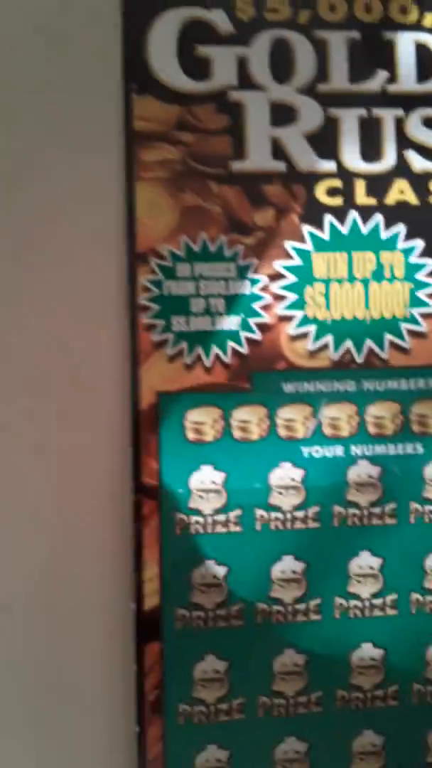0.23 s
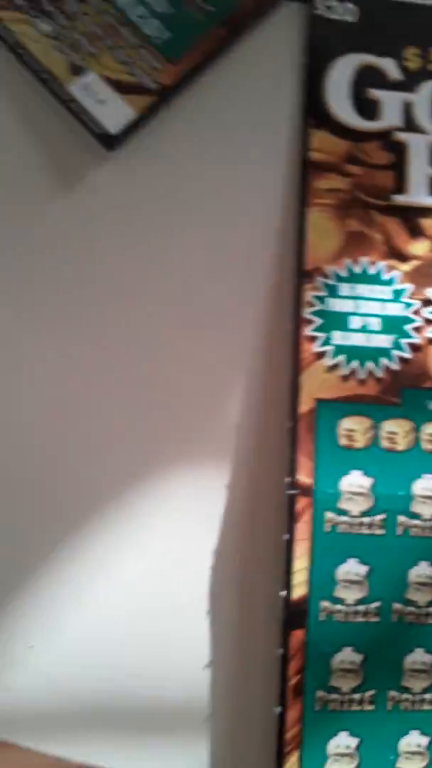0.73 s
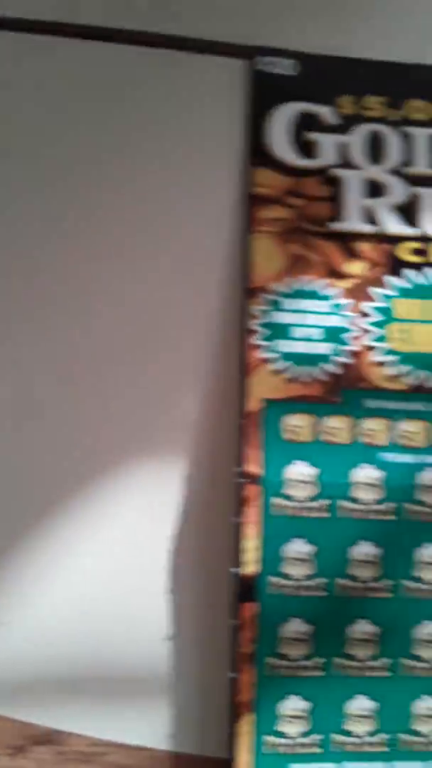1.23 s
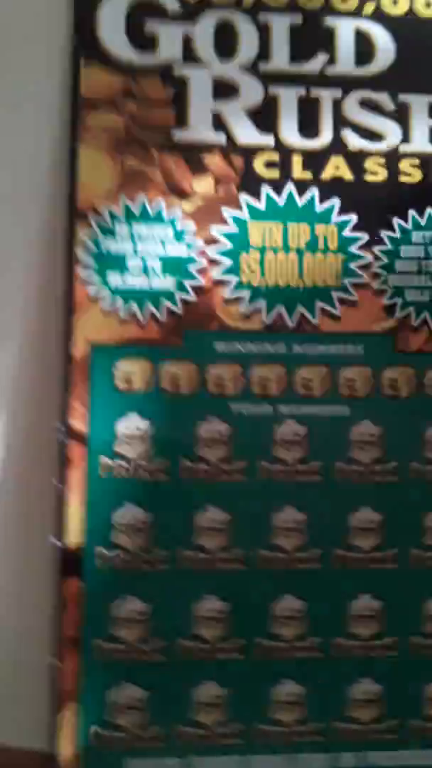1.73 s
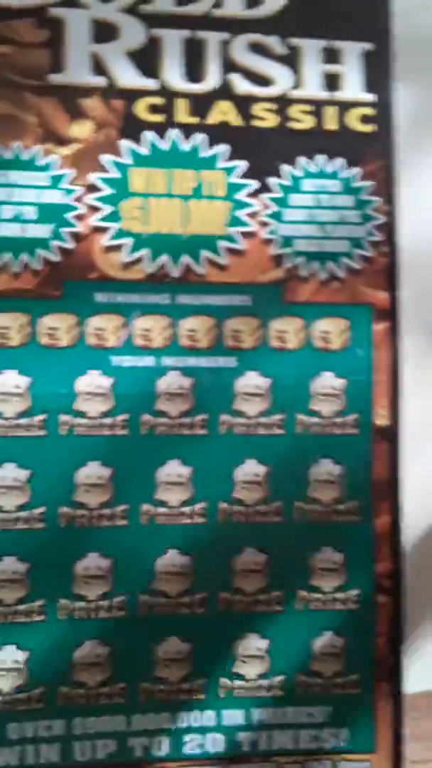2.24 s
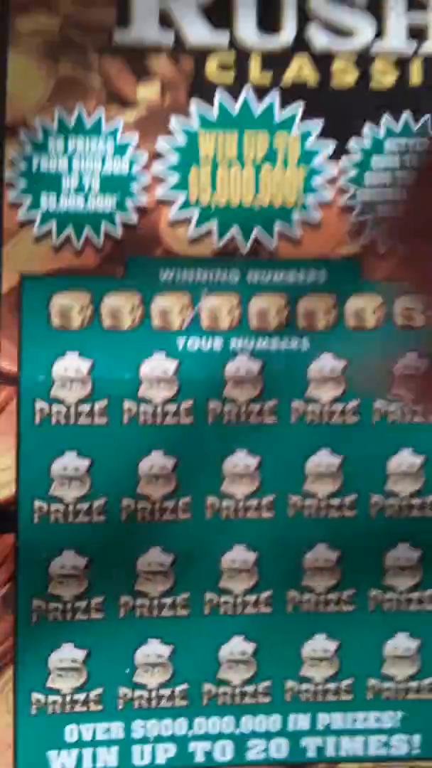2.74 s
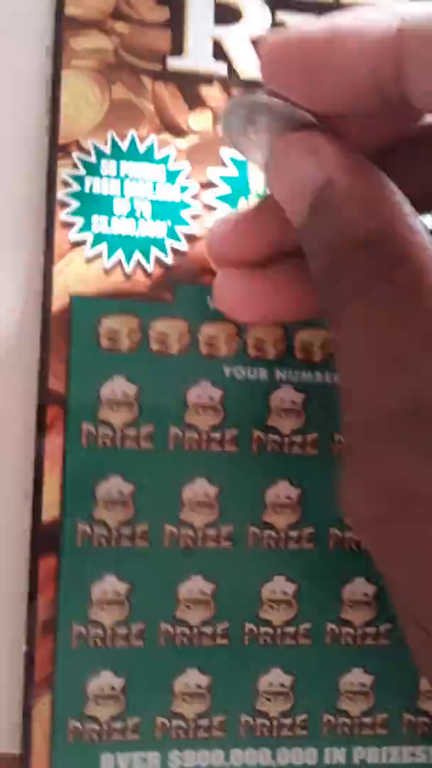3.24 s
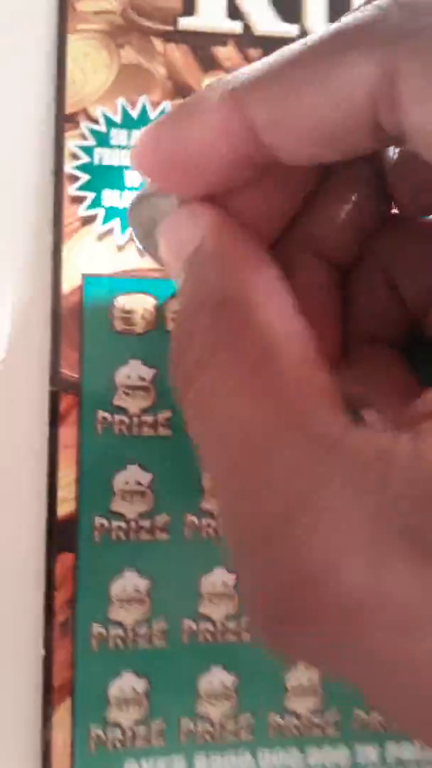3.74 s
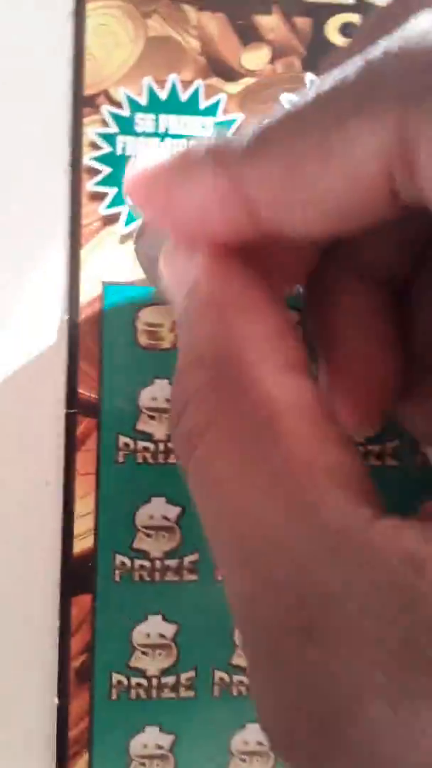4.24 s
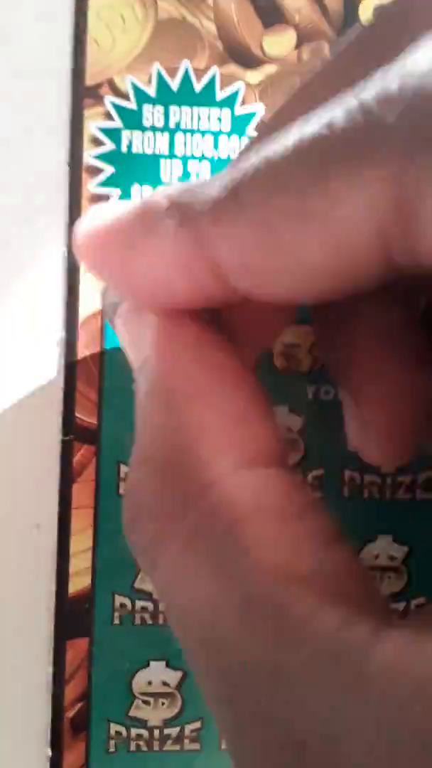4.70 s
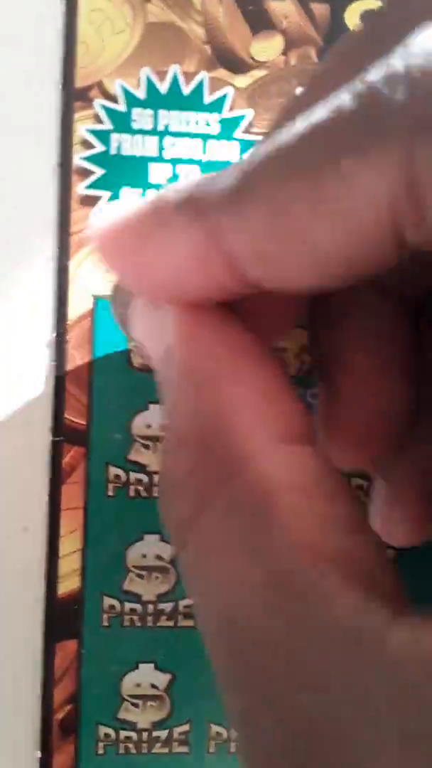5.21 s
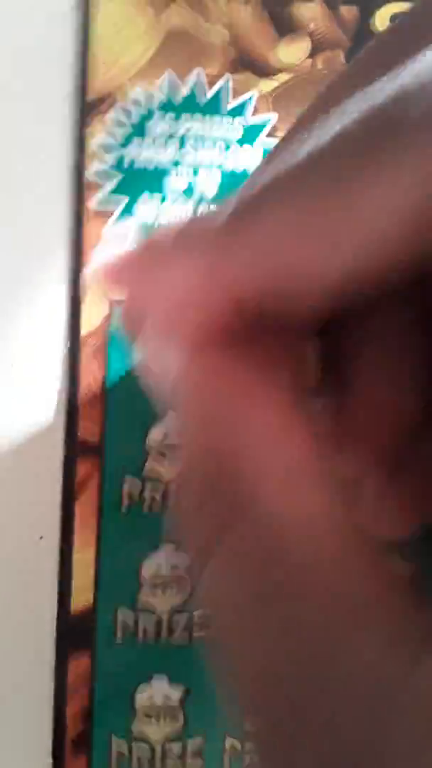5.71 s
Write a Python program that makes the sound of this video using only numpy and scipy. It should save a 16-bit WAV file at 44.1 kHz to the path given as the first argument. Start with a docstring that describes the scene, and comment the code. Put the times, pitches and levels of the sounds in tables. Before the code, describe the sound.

Close, mostly dry stereo sound at a table in a small live room, with a faint wavering low hum and soft hiss beneath. From 0 to 0.35 s a stiff card rustles in short slides, with light bumps and a crisp tick near 0.3 s; a fainter tick comes at 0.6. Around 0.72 s it snaps, and from 0.9 to 1.15 s it drags loudly, bright and papery, with several sharp cracks, the loudest event. Dull small wooden knocks follow at 1.4-1.55 s, then faint ticks and brushes near 1.8-2.2 s, and a firmer double knock at 2.5 s. Soft slides recur up to 3.5 s. A clear tick at 3.8 s leads to coin scraping from 4.0 s: weak first strokes, stronger after 4.4 s, short, irregular, about ten to twelve a second, gritty and hissing, with a woody midrange ring, continuing to the end with a sharp tick near 5.87 s.

```python
"""Card and coin on a table top

A card slides, cracks, ticks and knocks on a table top close to a pair of microphones: shaped noise and puffs.
Then a coin scrapes its coating in short quick strokes: random grit that hisses and makes the table ring.
Narrow bands of noise hum underneath, with soft random-spectrum room noise and a tail of sparse echoes."""
import sys
import numpy as np
from scipy import signal
from scipy.io import wavfile
from scipy.ndimage import uniform_filter1d

SR = 44100
rng = np.random.default_rng(int(sys.argv[2]) if len(sys.argv) > 2 else 0)


def amplitude_ratio(level_db):
    """Convert a level in decibels to the matching linear amplitude (field) ratio."""
    exponent = np.asarray(level_db, float) / 20
    return 10 ** exponent


def log_audio(samples):
    """Write samples as a 16-bit WAV file to the path given in sys.argv[1]."""
    # one column per channel
    frames = np.atleast_2d(samples).T
    # limit to full scale, then quantise
    limited = np.clip(frames, -1, 1)
    pcm = np.round(limited * 32767).astype(np.int16)
    wavfile.write(sys.argv[1], SR, pcm)


N = 262880


def evened(x):
    """Scales to rms 1."""
    return x / np.sqrt(np.mean(x ** 2) + 1e-20)


def read(points, hz):
    """Reads a table on a log-frequency axis."""
    f, value = np.transpose(points)
    return np.interp(np.log(hz + 1), np.log(f + 1), value)


def coloured(x, points):
    """Causal minimum-phase filter with the given spectrum; white rms 1 stays rms 1."""
    hz = abs(np.fft.fftfreq(4096, 1 / SR))
    log_gain = np.log(amplitude_ratio(np.maximum(read(points, hz), -100)))
    taps = np.fft.ifft(np.exp(signal.hilbert(log_gain).conj())).real[:2048]
    taps = (taps / np.linalg.norm(taps)).reshape((1,) * (x.ndim - 1) + (-1,))
    return signal.oaconvolve(x, taps, axes=-1)[..., :x.shape[-1]]


def tinted(puff, points):
    """Colours a puff and keeps its energy."""
    out = coloured(puff, points)
    return out * np.linalg.norm(puff) / np.linalg.norm(out)


def wander(steps):
    """Slow chance, about rms 1, changing over about the given number of samples."""
    slow = uniform_filter1d(rng.standard_normal(N // 64 + 2), max(round(steps / 64), 1))
    return np.interp(np.arange(N) / 64, np.arange(len(slow)), evened(slow))


def resonate(x, hz, width):
    """A resonance that follows the curve hz; white rms 1 stays rms 1."""
    turn = np.exp(2j * np.pi * np.cumsum(hz) / SR)
    r = np.exp(-np.pi * width / SR)
    return np.sqrt(2 * (1 - r * r)) * (turn * signal.lfilter([1], [1, -r], x / turn)).real


def ringing(x, modes, moving_db, steady):
    """Damped modes, excited unevenly as the contact moves; slipping locks to the ring and steadies it."""
    t = np.arange(4096) / SR
    out = 0
    for hz, width, db in modes:
        decay = t * np.exp(-1.5 * np.pi * width * t)
        tap = amplitude_ratio(db) * (1.5 * width) ** 2 * decay * np.sin(2 * np.pi * hz * t)
        drive = x * amplitude_ratio(moving_db * wander(3000))
        out = out + signal.oaconvolve(drive, tap[None], axes=1)[:, :N]
    power = abs(uniform_filter1d((out ** 2).mean(0), 220)) + 1e-12
    return evened(out / power ** (np.clip(steady, 0, 1) / 2))


def envelopes(start, length, db, shape):
    """Gain of a run of gestures: each rises, sags while held, and falls away."""
    rise, sag_db, fall, end_db = shape
    corners = [0, np.clip(rise, .02, .5), 1 - np.clip(fall, .02, .48), 1]
    out, t = np.zeros(N), np.arange(N) / SR
    for s, span, peak_db in zip(start, np.maximum(length, .005), db):
        at = slice(*np.searchsorted(t, [s, s + span]))
        progress = (t[at] - s) / span
        out[at] += amplitude_ratio(peak_db + np.interp(progress, corners, [end_db, 0, sag_db, end_db]))
    return out


def grit(per_s, spread_db, clump_db):
    """Tiny catches of an edge on a rough face: random clicks of uneven size that come in clumps."""
    size = amplitude_ratio(spread_db * np.minimum(rng.exponential(1, N), 4)) * rng.standard_normal(N)
    clumps = evened(uniform_filter1d(uniform_filter1d(rng.standard_normal(N), 120), 120))
    return evened(size * (rng.random(N) < per_s / SR) * amplitude_ratio(clump_db * clumps))


def spread(per_s, spread_db, clump_db, same, lag):
    """Grit at two ports: a shared part, lag samples later on the left (earlier if negative), plus their own."""
    shared, same = grit(per_s, spread_db, clump_db), np.clip(same, 0, 1)
    own = np.array([grit(per_s, spread_db, clump_db) for port in "lr"])
    return np.sqrt(same) * np.array([np.roll(shared, round(lag)), shared]) + np.sqrt(1 - same) * own


def burst(t60, same, lag):
    """A dying puff of noise at both ports; the left hears its shared part lag samples later."""
    t, same = np.arange(8000) / SR, np.clip(same, 0, 1)
    onset = np.minimum(t / 0.0005, 1)
    shape = 0.33 * amplitude_ratio(-60 * t / np.clip(t60, .002, .25)) * onset
    shared, left, right = shape * rng.standard_normal((3, 8000))
    common = np.array([np.roll(shared, round(lag)), shared])
    puff = np.sqrt(same) * common + np.sqrt(1 - same) * np.array([left, right])
    return puff * np.linalg.norm(shape) / np.linalg.norm(puff, axis=1, keepdims=True)


def panned(pan_db):
    """Gains of the two ports, pan_db being left over right."""
    return amplitude_ratio([pan_db / 2, -pan_db / 2]).reshape(2, -1)


def add(mix, s, sound, pan_db):
    """Mixes a short two-port sound in at s seconds."""
    part = mix[:, round(s * SR):][:, :sound.shape[1]]
    part += (sound * panned(pan_db))[:, :part.shape[1]]


# Spectrum of the room noise: (frequency [Hz], relative density [dB/Hz])
AIR_SPECTRUM = [(12, -65), (20, -35), (37, -12), (60, -12), (75, -22), (143, 8.5), (195, -22.5),
                (297, -28.5), (440, -28), (616, -31), (1210, -37), (3230, -39.5), (8650, -50),
                (15200, -40.5), (16500, -61)]
# How alike the two ports are, in the noise and in the room tail: (frequency [Hz], likeness [-1 to 1])
PORT_LIKENESS = [(60, 0.1), (180, 0.76), (550, 0.41), (1650, -0.00019), (4970, -0.027), (15000, -0.086)]


def air():
    """Room noise and microphone hiss: random spectra above 180 Hz with faint drifting patches."""
    frames, hz = N // 512 + 5, np.fft.rfftfreq(2048, 1 / SR)
    a, b, c, d, patches = rng.standard_normal((frames, 1025, 5)).T
    patches = evened(uniform_filter1d(uniform_filter1d(patches, 20, 0), 8, 1))
    same = np.clip(read(PORT_LIKENESS, hz), -1, 1)[:, None]
    left, own = a + 1j * b, c + 1j * d
    z = np.array([left, same * left + np.sqrt(1 - same ** 2) * own])
    z *= amplitude_ratio(read(AIR_SPECTRUM, hz)[:, None] + 1.93 * patches) * (hz > 180)[:, None]
    noise = signal.istft(z, nperseg=2048, noverlap=1536)[1][:, :N]
    return amplitude_ratio(-63.5) * evened(noise)


# Fuzzy low tones: (frequency [Hz], width [Hz], level [dB], steadiness [0 to 1])
HUM_TONES = [(56.5, 13.07, -70, 0.1), (75.5, 15, -74.5, 0.2), (107, 23, -66, 0), (144.2, 14.9, -59, 0.38)]
# Wavering of the highest tone, heard as its swing about the mean: (time [s], level [dB])
HUM_SWELL = [(0.0, -54), (0.2, -51.5), (0.28, -63.5), (0.8, -56.5), (1.31, -64.5), (2.39, -56), (2.61, -69),
             (2.72, -53), (2.82, -68.5), (3.88, -57.5), (3.97, -64.5), (5.0, -58.5), (5.26, -68.5),
             (5.28, -58), (5.5, -54), (5.71, -63), (5.93, -56), (5.96, -52)]


def hum():
    """Distant machinery in room resonances: narrow bands of noise, the highest one swelling."""
    t, tones = np.arange(N) / SR, []
    for hz, width, db, steady in HUM_TONES:
        r = np.exp(-np.pi * width / SR)
        slow = rng.standard_normal((2, N)) + 1j * rng.standard_normal((2, N))
        ports = [slow[0], slow[0] + 0.225 * slow[1]]
        slow = signal.lfilter([1], [1, -2 * r, r * r], ports, axis=1)
        slow /= abs(slow[0]) ** steady  # a steady tone wavers less than plain noise
        tones.append(amplitude_ratio(db) * evened((slow * np.exp(2j * np.pi * hz * t)).real))
    swell_db = np.interp(t, *np.transpose(HUM_SWELL))
    tones[-1] *= amplitude_ratio(swell_db - swell_db.mean())
    return sum(tones) * amplitude_ratio([[.8], [-.8]])


# Short slides of card or fingers, levels before the layer trims:
# (start [s], length [s], rustle [dB], top over rustle [dB], body over rustle [dB], focus [Hz])
SLIDES = [(-.01, 0.071, -46, -0.5, -3.5, 4200), (0.057, 0.088, -55, 0, -8, 4000),
          (0.146, 0.12, -58.5, 4, -15, 3680), (0.235, 0.12, -59, -4, -9, 3540),
          (0.719, 0.046, -49, -1, -21, 3500), (0.756, 0.045, -58, -9.5, -10, 3700),
          (1.812, 0.049, -61.5, -2, 5.5, 3600), (1.885, 0.1, -63, -15, -0.5, 3820),
          (2.077, 0.088, -60, -5, -5, 4620), (2.203, 0.3, -70, -10, 0, 2100),
          (2.69, 0.2, -67.5, -8, -0.5, 2120), (2.888, 0.11, -76, 7.5, 3, 3840),
          (3.075, 0.065, -65.5, -3.5, -2, 2960), (3.227, 0.051, -66.5, -10, -2.5, 3950),
          (3.262, 0.054, -60.5, -8, -6, 3940), (3.294, 0.14, -61.5, -1.5, -6.5, 4100),
          (3.512, 0.028, -64, -6, -7, 4170)]
# Contour of a slide: (share of the length rising, sag while held [dB], share falling, level at the ends [dB])
SLIDE_SHAPE = (0.28, -3.5, 0.4, -15)
# One long loud drag of the card, levels before the layer trims:
# (time [s], rustle [dB], top over rustle [dB], body over rustle [dB], focus [Hz])
DRAG = [(0.815, -61, -0.5, -15, 3800), (0.867, -46.5, -10, -14.5, 4240), (0.904, -53, -11.5, -10, 3070),
        (0.943, -39, -2.5, -17, 2940), (0.964, -41.5, -11, -15.5, 4320), (1.028, -30.5, -2.5, -13, 5370),
        (1.065, -32, 1, -21.5, 5900), (1.139, -36.5, -7, -12, 3880), (1.225, -69, -11, 4, 4540),
        (1.3, -83.5, -23, 6, 4600)]
# Spectra of the card's rustle, top and body: (frequency [Hz], relative density [dB/Hz])
RUSTLE = [(880, -34.5), (1500, -21.5), (1670, -34), (1990, -3.5), (2190, -5), (2390, -7.5), (3410, -8),
          (6890, -8), (8500, -40.5), (11000, -36), (18700, -120)]
RUSTLE_TOP = [(4410, -27.5), (7500, 3.5), (8310, -3.5), (11600, 2.5), (15400, -2.5), (16200, -31),
              (16500, -53.5)]
RUSTLE_BODY = [(120, -24), (300, -4.5), (520, -3), (1000, -1), (1900, -0.5), (2800, -27)]
# Where the card is handled: (time [s], left over right [dB])
CARD_SIDE = [(0, 4), (.7, 4), (1.1, 0.5), (1.9, 3), (2.3, -1), (3.5, 2)]


def slides():
    """Paper dragged over paper and wood: dense grit through the rustle of the card, with a moving focus."""
    t = np.arange(N) / SR
    start, length, db, top_db, body_db, hz = np.transpose(SLIDES)
    s, drag_db, drag_top_db, drag_body_db, drag_hz = np.transpose(DRAG)
    dragging = (t > s[0]) & (t < s[-1])

    def layer(rel_db, drag_rel_db):
        """Gain of one band through the short slides and the long drag."""
        drag = dragging * amplitude_ratio(np.interp(t, s, drag_db + drag_rel_db))
        return envelopes(start, length, db + rel_db, SLIDE_SHAPE) + drag

    mid, top, body = layer(0, 0), layer(top_db, drag_top_db), layer(body_db, drag_body_db)
    latest = np.maximum(np.searchsorted(start, t) - 1, 0)
    focus_hz = np.where(dragging, np.interp(t, s, drag_hz), hz[latest])
    focus_db = np.where(dragging, -11.5, -6.5)  # how strongly the card sings at its focus
    catches = spread(14000, 2.9, 2.7, 0.34, -14)
    rustle = coloured(mid * catches, RUSTLE)
    sound = amplitude_ratio(1) * rustle + amplitude_ratio(focus_db) * resonate(rustle, focus_hz, 520)
    sound += amplitude_ratio(3.0) * coloured(top * catches, RUSTLE_TOP)
    sound += amplitude_ratio(3.5) * coloured(body * catches, RUSTLE_BODY)
    return sound * panned(np.interp(t, *np.transpose(CARD_SIDE)))


# The hand leans on the table top: (start [s], length [s], level [dB])
BUMPS = [(-.01, 0.04, -46), (0.021, 0.05, -40.5), (0.105, 0.058, -49), (0.292, .05, -59),
         (0.753, 0.04, -53.5), (0.838, 0.08, -51), (1.008, 0.034, -55), (1.1, 0.055, -56),
         (1.813, 0.034, -59)]
# Coin strokes, to and fro: (start [s], length [s], ring of the table [dB], dull rub [dB],
# low thud [dB], hiss of the coating [dB])
STROKES = [(4.008, 0.022, -62, -59.5, -64, -74.5), (4.124, 0.053, -59.5, -51, -57.5, -61),
           (4.247, 0.042, -58, -59, -66, -63), (4.334, .06, -54, -56, -56, -62.5),
           (4.428, 0.051, -44.5, -52, -69, -56.5), (4.509, 0.049, -50.5, -48.5, -53, -51.5),
           (4.595, .03, -40.5, -51, -66, -56), (4.617, 0.038, -54, -52.5, -65, -58),
           (4.676, 0.02, -50, -55, -52, -53.5), (4.686, 0.059, -54.5, -52, -54, -58.5),
           (4.762, 0.02, -50, -54, -58, -58), (4.789, 0.023, -43.5, -47.5, -59, -62),
           (4.838, 0.051, -48.5, -51, -53.5, -58.5), (4.922, 0.026, -46.5, -56.5, -63, -63),
           (4.945, 0.031, -66, -57.5, -65, -64), (5.013, 0.054, -45.5, -52.5, -52.5, -58.5),
           (5.086, 0.065, -39.5, -53, -62, -54.5), (5.181, 0.059, -43.5, -52.5, -56, -55.5),
           (5.268, 0.054, -40.5, -52.5, -58, -56.5), (5.35, 0.056, -45, -51, -59, -59),
           (5.407, 0.075, -63, -62, -59, -62.5), (5.468, 0.022, -45, -61, -63, -66),
           (5.506, 0.052, -61, -61, -56.5, -65), (5.544, .022, -38.5, -58, -55, -50.5),
           (5.564, 0.016, -40, -49.5, -48, -61), (5.624, 0.038, -50, -59, -60, -65),
           (5.702, .08, -43.5, -51.5, -51, -55), (5.798, 0.039, -46, -66, -67, -55.5),
           (5.88, .026, -48.5, -51.5, -52.5, -57), (5.897, 0.047, -42.5, -53.5, -51, -54.5)]
# Contour of a stroke: (share of the length rising, sag while held [dB], share falling, level at the ends [dB])
STROKE_SHAPE = (0.34, -3.5, 0.23, -15.5)
# Lowest modes of the table top: (frequency [Hz], width [Hz], relative level [dB])
LOW_MODES = [(219, 253, -8.5), (262.7, 33, 0.5), (328, 31, 2), (426, 107, -10)]


def thuds():
    """The weight of coin and hand drives the lowest modes of the table top."""
    start, length, _, _, thud_db, _ = np.transpose(STROKES)
    coin_weight = envelopes(start + .006, length, thud_db, STROKE_SHAPE)  # the table answers 6 ms late
    hand_weight = envelopes(*np.transpose(BUMPS), SLIDE_SHAPE)
    modes = ringing(spread(8200, 1.5, 1.2, 0.92, -3.7), LOW_MODES, 2.4, 0.97)
    return (coin_weight + hand_weight) * modes * panned(1.5)


# Dry ticks of an edge or nail:
# (time [s], level [dB], low relative level [dB], top relative level [dB], left over right [dB])
TICKS = [(0.0313, -35, -13, -5, 9), (0.2967, -22.5, 0.5, -25, 5), (0.6209, -35, -5, 0.5, 5.5),
         (1.2354, -42, 11, -15, 11), (1.8263, -45, 9, -13, 5), (1.9066, -36, 8.5, -13, 7.5),
         (3.8088, -20.5, -6.5, -12, 3.5), (5.487, -43, -11, -8, 2.5), (5.66, -38.5, -17, 7, 5),
         (5.7249, -37.5, 5, 3, 14), (5.8106, -46, 11, 3, 6), (5.8724, -23, -36, -5, -5.5)]


def ticks():
    """An edge taps briefly: a very short noise puff split into low, middle and top bands."""
    out = np.zeros((2, N))
    for s, db, low_db, top_db, pan_db in TICKS:
        puff = burst(0.0089, 0.43, 12)
        low = tinted(puff, [(300, 0.0), (700, -14), (3200, -4.0), (5000, -21), (9000, -46)])
        mid = tinted(puff, [(1000, -55), (2400, -29), (3800, -6.5), (6500, 7), (8200, -5), (11000, -20)])
        top = tinted(puff, RUSTLE_TOP)
        add(out, s, amplitude_ratio(db) * (mid + amplitude_ratio(low_db) * low + amplitude_ratio(top_db) * top), pan_db)
    return out


# Paper cracks as the card bends:
# (time [s], level [dB], centre [Hz], top relative level [dB], left over right [dB])
SNAPS = [(0.159, -38.5, 7300, -23, 21.5), (0.1996, -37.5, 3720, -0.5, 4), (0.7228, -24, 3640, -46, 7),
         (0.7494, -28, 3680, -25, 1.5), (0.9185, -21.5, 2680, -25, 11.5), (0.9426, -16, 2670, -26, 4.5),
         (0.988, -13, 6100, -16, 6), (1.0584, -10.5, 6730, -8, 4), (1.117, -11.5, 2400, -18, 1),
         (1.9325, -43, 3600, -13, 2)]


def snaps():
    """Bending paper cracks: a brief noise puff round its own centre, with a bright top."""
    out = np.zeros((2, N))
    for s, db, hz, top_db, pan_db in SNAPS:
        puff = burst(0.039, 0.6, 12)
        centre = [(hz / 4, -35), (hz / 1.84, -11), (hz, 0), (hz * 1.35, -9), (hz * 5.1, -18), (hz * 5, -40)]
        crack = tinted(puff, centre) + amplitude_ratio(top_db) * tinted(puff, RUSTLE_TOP)
        add(out, s, amplitude_ratio(db) * crack, pan_db)
    return out


# Dull knocks on the table:
# (time [s], level [dB], centre [Hz], middle relative level [dB], top relative level [dB])
KNOCKS = [(1.385, -35.5, 770, -8, -45), (1.443, -40.5, 736, -18, -31), (1.508, -27.5, 730, -12, -33),
          (1.549, -43.5, 785, -7, -38), (1.822, -47, 404, 4.5, -14), (2.478, -26.5, 600, 3.5, -9),
          (2.504, -34, 610, 5.5, -1)]
# What lingers after a knock: (frequency [Hz], relative level [dB], t60 [s])
LINGERING_MODES = [(494, 6.5, .2), (1514, 9, 0.15), (2010, 1, 0.4), (2190, 0, 0.36), (3020, 7, 0.2)]
# Middle modes of card and table, also rubbed by the coin: (frequency [Hz], width [Hz], relative level [dB])
MIDDLE_MODES = [(646, 19.4, -5.5), (809, 136, 4.5), (844, 17, -31), (1059.4, 29, 2.5), (1094, 240, -2)]


def knocks():
    """A blow on the table top: wooden body and modes, sharper middle, thin top and modes that linger."""
    out, t = np.zeros((2, N)), np.arange(SR // 3) / SR
    linger = sum(amplitude_ratio(db - 60 * t / t60) * np.sin(2 * np.pi * f * t) for f, db, t60 in LINGERING_MODES)
    linger = linger[None] / np.linalg.norm(linger)
    wood = sum(amplitude_ratio(db) * np.sqrt(w) * np.exp(-np.pi * w * t) * np.sin(2 * np.pi * f * t)
               for f, w, db in MIDDLE_MODES)
    wood = wood[None] / np.linalg.norm(wood)
    side_db = 0.5
    for s, db, hz, mid_db, top_db in KNOCKS:
        puff = burst(.13, 0.38, 10.3)
        body = tinted(puff, [(hz / 3.3, -32), (hz / 1.76, -9), (hz, 0), (hz * 1.4, -6),
                             (hz * 5, -22), (hz * 12, -60)])
        middle = tinted(puff, [(300, -35.5), (900, -5), (1600, -1.0), (3000, -6.5),
                               (5000, -16.5), (8000, -22.5), (12000, -80)])
        top = tinted(puff, [(1500, -79.0), (3500, -13), (5500, -9.0), (8500, -15.5),
                            (12500, -7.5), (16500, -26.5)])
        add(out, s, amplitude_ratio(db) * (body + amplitude_ratio(mid_db) * middle + amplitude_ratio(top_db) * top), side_db)
        struck_wood = signal.oaconvolve(burst(0.05, 0.83, 10), wood, axes=1)
        add(out, s, amplitude_ratio(db - 2.5) * struck_wood, side_db)
        # the lingering modes follow the level of the top
        add(out, s, amplitude_ratio(db + top_db - 4.0) * signal.oaconvolve(puff, linger, axes=1), side_db)
    return out


# How late ring, rub and hiss answer a stroke: (ring [s], rub [s], hiss [s])
STROKE_LAG = (0.00054, 0.0034, 0.00033)
# Left over right balance of the layers: (ring [dB], rub [dB], hiss [dB])
LAYER_SIDE = (-2.5, 6.5, 2.7)
# What the table rings with under the coin: (frequency [Hz], width [Hz], relative level [dB])
TABLE_MODES = [(1402, 85, -6), (1490, 29, -17), (1714, 78, 5.5), (2040, 93, -8.5), (2796, 250, -22),
               (3270, 300, -26)]
# Spectrum of the scraped coating: (frequency [Hz], relative density [dB/Hz])
COATING = [(1410, -23), (2400, -9.5), (2580, -27), (2820, -9), (3400, -8.5), (3770, -14.5), (6070, -10.5),
           (8050, -19.5), (14000, -12), (16100, -14), (16500, -40)]


def coin():
    """The coin edge catches on the coating: the grit hisses and drives the modes of card and table."""
    start, length, ring_db, rub_db, _, hiss_db = np.transpose(STROKES)
    ring, rub, hiss = (envelopes(start + lag, length, db, STROKE_SHAPE) * panned(pan_db)
                       for lag, db, pan_db in zip(STROKE_LAG, [ring_db, rub_db, hiss_db], LAYER_SIDE))
    sound = ring * ringing(spread(5000, 4.0, 2.4, 0.58, -7), TABLE_MODES, 2.3, 0.65)
    sound += rub * ringing(spread(9800, 4.5, 1.3, 0.24, -11.5), MIDDLE_MODES, 2.4, 0.96)
    catches = spread(3000, 3.1, 3.3, 0.19, -6.5)
    # a shifting bright edge that follows the ring's level
    rasp_hz = 2980 + 251 * wander(2000)
    sound += amplitude_ratio(-16) * resonate(ring * catches, rasp_hz, 260)
    return sound + coloured(hiss * catches, COATING) * amplitude_ratio(2.5 * wander(600))


# Decay of the room: (frequency [Hz], t60 [s])
ROOM_DECAY = [(250, 0.44), (660, 0.47), (1740, 0.46), (4600, 0.5), (12000, 0.31)]


def room(x):
    """Sparse echoes of random sign, each band dying at its own speed, partly shared by the ports."""
    taps = np.zeros((2, SR))
    at = np.arange(200, SR - 20, 20) + rng.integers(0, 20, (2, (SR - 201) // 20))
    np.put_along_axis(taps, at, rng.choice([-1., 1.], at.shape), 1)
    hz, t, z = signal.stft(taps, SR, nperseg=256)
    same = np.clip(read(PORT_LIKENESS, hz), 0, 1)[:, None]
    z[1] = same * z[0] + np.sqrt(1 - same ** 2) * z[1]
    t60 = np.maximum(read(ROOM_DECAY, hz), .05)[:, None]
    tail = signal.istft(z * amplitude_ratio(-60 * t / t60), SR, nperseg=256)[1]
    return signal.fftconvolve(x, tail / np.linalg.norm(tail[0]), axes=1)[:, :N]


def scene():
    """Near sounds dry and in the room; knocks are the wettest."""
    paper = slides()
    scrape = thuds() + coin()
    cracks = ticks() + snaps()
    blows = knocks()
    wet = room(amplitude_ratio(-11.5) * scrape + amplitude_ratio(-9.5) * paper + amplitude_ratio(-15) * cracks + amplitude_ratio(-3.0) * blows)
    return scrape + paper + cracks + blows + wet + air() + hum()


def band_limit(x):
    """A steep low-pass at the top of the band."""
    return signal.sosfilt(signal.butter(12, 16710, fs=SR, output="sos"), x)


def record(dry):
    """The microphones roll off the deep bass below 42 Hz."""
    mix = signal.sosfilt(signal.butter(4, 42, "high", fs=SR, output="sos"), dry)
    return band_limit(mix)


dry = scene()
out = record(dry)
log_audio(out)
```